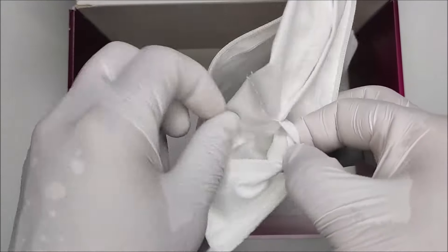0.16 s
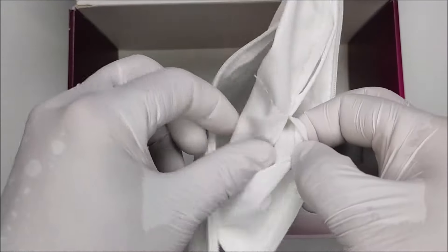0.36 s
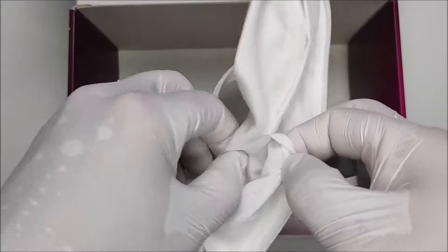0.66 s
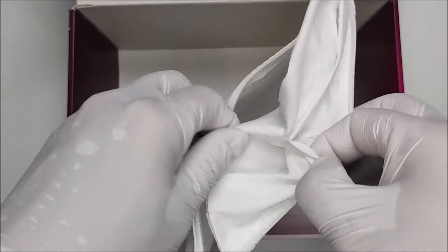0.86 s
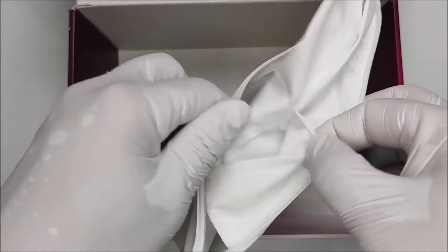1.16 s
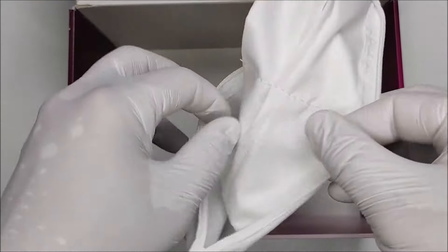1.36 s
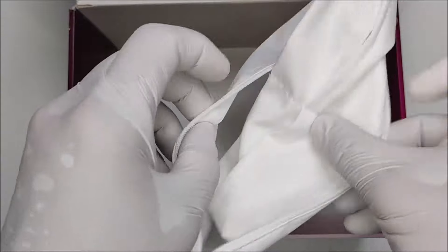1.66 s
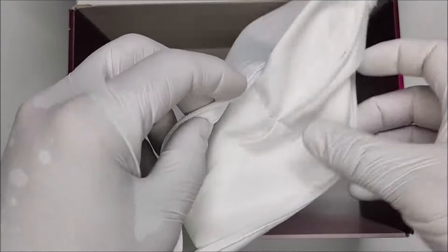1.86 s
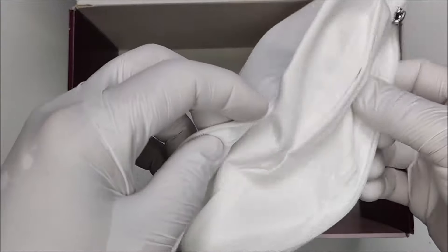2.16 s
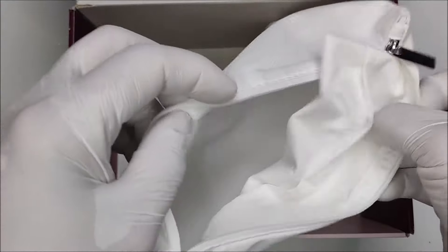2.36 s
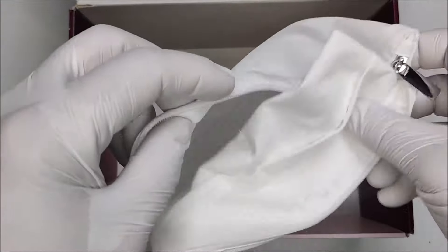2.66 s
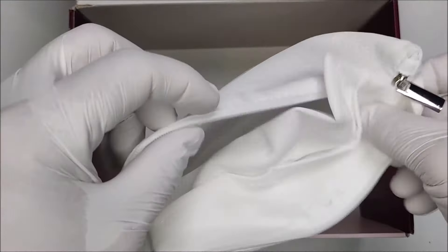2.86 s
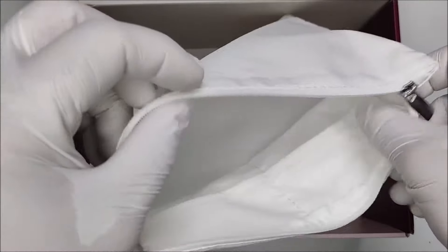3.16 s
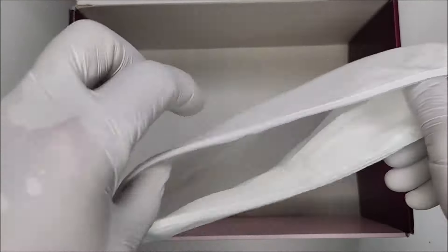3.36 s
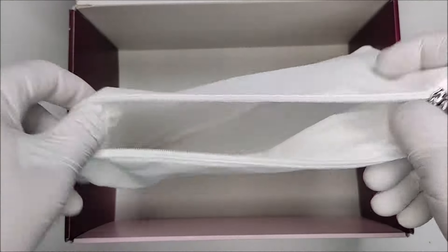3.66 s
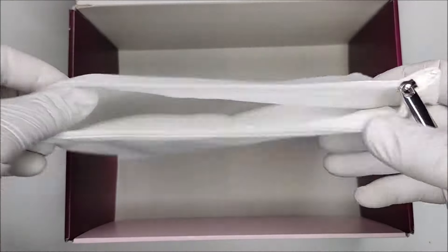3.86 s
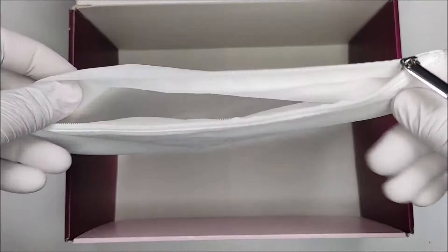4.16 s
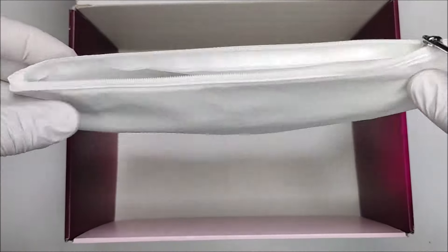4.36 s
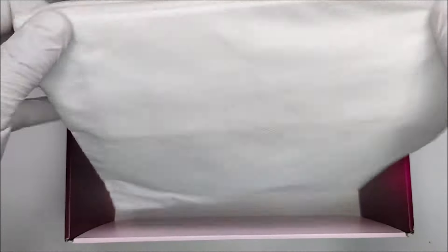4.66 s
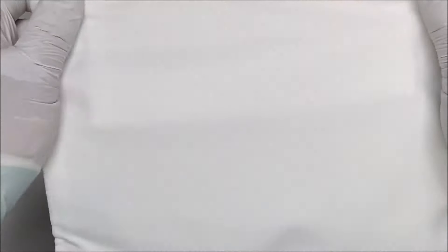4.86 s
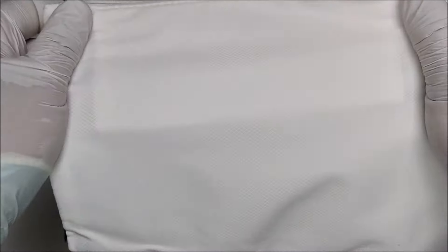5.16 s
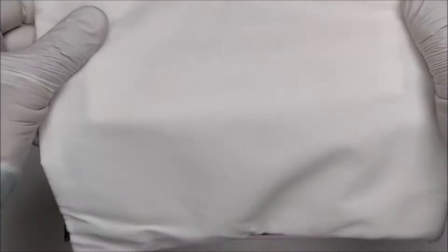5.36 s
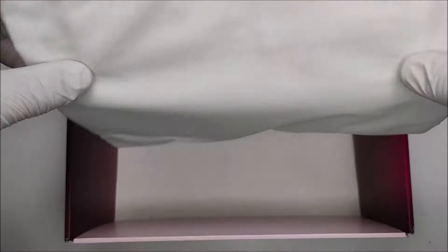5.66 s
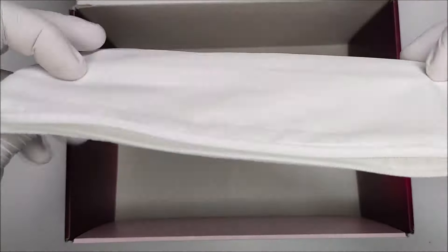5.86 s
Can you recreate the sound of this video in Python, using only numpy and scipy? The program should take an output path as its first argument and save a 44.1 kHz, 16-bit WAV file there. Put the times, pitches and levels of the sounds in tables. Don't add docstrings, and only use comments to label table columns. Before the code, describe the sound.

Close, soft cloth rustling as gloved hands unfold and stretch a zippered pouch, with small metallic zip ticks and faint hollow cardboard knocks.

```python
import sys
import numpy as np
from scipy import signal
from scipy.fft import rfft, irfft
from scipy.io import wavfile
from scipy.ndimage import uniform_filter1d

SR = 44100
rng = np.random.default_rng(int(sys.argv[2]) if len(sys.argv) > 2 else 0)


def dump_mix(stems):
    frames = np.atleast_2d(stems).T
    limited = np.clip(frames, -1, 1)
    pcm = np.round(limited * 32767).astype(np.int16)
    wavfile.write(sys.argv[1], SR, pcm)


def rack_gain(trim_db):
    fader = np.asarray(trim_db, float)
    return 10 ** (fader / 20)


N = 265482


def shape(x, points):
    hz, db = np.transpose(points)
    f = np.arange(N // 2 + 1) * SR / N + 1e-3
    gain = rack_gain(np.interp(np.log(f), np.log(hz), db))
    return irfft(rfft(x) * gain, N)


def band(x, lo_hz, hi_hz):
    edges = [lo_hz, min(hi_hz, 0.49 * SR)]
    return signal.sosfilt(signal.butter(2, edges, "bandpass", fs=SR, output="sos"), x)


def walk(rate_hz):
    hold = int(SR / rate_hz)
    levels = np.repeat(rng.standard_normal(N // hold + 1), hold)
    return 1.06 * uniform_filter1d(levels, hold)[:N]


def ring(modes, t):
    return sum(rack_gain(db) * np.sin(2 * np.pi * hz * t) * np.exp(-np.log(1000) * t / t60)
               for hz, db, t60 in modes)


def add(out, x, start_s, peak_db, pan_db, lag):
    x = x * rack_gain(peak_db) / np.abs(x).max()
    for side, delay, gain in ((0, lag, rack_gain(pan_db / 2)), (1, 0, rack_gain(-pan_db / 2))):
        i = int(start_s * SR + delay)
        out[side, i:i + len(x)] += gain * x[:N - i]


# peak_s, hiss_db,
# rise_ms and fall_ms [per 10 dB], crumple_db [over hiss]
HAND_STROKES = [(0.002, -55.5, 50, 302, -4.5), (.322, -54.5, 130, 111, -13), (.432, -50.5, 35, 57, -14),
                (0.562, -56, 42, 62, -7.5), (.651, -56.5, 72, 274, -10), (0.927, -52, 69, 61, -6.5),
                (1.219, -50.5, 50, 61, -9), (1.305, -51.5, 88, 76, -7.5), (1.454, -55.5, 78, 220, -10),
                (1.639, -49, 57, 290, -20), (1.759, -57.5, 189, 75, -0.5), (1.858, -54, 37, 137, -5),
                (2.003, -63.5, 62, 45, 11), (2.197, -58.5, 40, 298, -8.5), (2.31, -57.5, 115, 50, -6.5),
                (2.386, -45, 49, 139, -5), (2.699, -50.5, 90, 107, -4.5), (2.831, -50, 63, 48.5, -11),
                (2.946, -48.5, -1, 65, -16), (2.985, -43.5, 34, 58, -14.5), (3.04, -47.5, 111, 53, -5),
                (3.238, -55, 49, 330, -7), (3.495, -53.5, 90, 150, -10), (3.649, -53.5, 170, 60.4, -9.5),
              (3.749, -52, 21, 75, -8.5), (3.879, -50.5, 143, 143, -10.5), (4.173, -54.5, 150, 298, -9.5),
              (4.422, -49.5, 205, 135, -15), (4.617, -51.5, 110, 80, -14.5), (4.707, -50.5, 80, 132, -21),
              (4.916, -56, 470, 69, -4.5), (5.006, -58, 66, 62, -5.5), (5.375, -55, 18, 600, -11.5),
              (5.47, -54, 88, 296, -9), (5.62, -51, 120, 279, -16), (5.83, -60, 100, 50.3, -1.5),
              (5.908, -50, 69, 80, -12), (5.984, -49.5, 46, 35, -13)]


def strokes(stall=0.096, rub_db=-7, rub_per_crumple=0.21):
    step = 32
    t = np.arange(0, N, step) / SR
    power = 1e-12
    for peak_s, hiss_db, rise_ms, fall_ms, crumple_db in HAND_STROKES:
        away = 1000 * np.where(t < peak_s, (peak_s - t) / max(rise_ms, 9), (t - peak_s) / fall_ms)
        level_db = hiss_db - 10 * away * (1 + stall * away)
        over_hiss_db = np.array([[0], [rub_db + rub_per_crumple * crumple_db], [crumple_db]])
        power = power + rack_gain(level_db + over_hiss_db) ** 2
    return np.sqrt(np.repeat(power, step, axis=1)[:, :N])


# pitch_hz, level_db
CLOTH_COLOUR = [(60, -2), (130, 3), (400, 0.5), (900, -2), (1450, -6.5), (2000, 0), (2800, -7), (3600, -5),
                (7000, 2), (12000, -4), (14500, -17)]


def fibres(snaps_per_s=3000, spread_db=4.5, grain_db=-7):
    size = rack_gain(spread_db * np.minimum(rng.exponential(size=N), 4))
    snapped = rng.random(N) < snaps_per_s / SR
    snaps = band(snapped * size * rng.standard_normal(N), 2030, 21000)
    x = rng.standard_normal(N) + rack_gain(grain_db) * snaps / snaps.std()
    x = x * rack_gain(1.5 * walk(30) + 2.5 * walk(200))
    return shape(x / x.std(), CLOTH_COLOUR)


# time_s, right_hand_share [0-1], left_minus_right_db
HAND_PLACES = [(0, 0, 1), (.8, 0.4, 0), (1.5, 0.2, 3.5), (1.9, 0.03, 3.5), (2.5, 0.1, 3), (3.2, 0, 2),
               (3.55, 1, 5.5), (3.7, 0.6, 0), (4.2, 0.76, 2), (4.7, 0.94, 0.5), (5.7, 1, 1.5),
               (6.02, 0.9, 4)]


def rustle(lag_left=-3, lag_right=12, scatter_db=2.5, lumpy_db=3.0, patchy_db=1.0):
    t = np.arange(N) / SR
    sliding, rubbing, folding = strokes()
    time_s, share, pan_db = np.transpose(HAND_PLACES)
    right = np.clip(np.interp(t, time_s, share), 0, 1)
    pan_db = np.interp(t, time_s, pan_db)
    left_gain, right_gain = np.sqrt(1 - right), np.sqrt(right)
    left_hand, right_hand = fibres(), fibres()
    at_left = left_gain * np.roll(left_hand, lag_left) + right_gain * np.roll(right_hand, lag_right)
    at_right = left_gain * left_hand + right_gain * right_hand
    scattered = band(np.array([fibres(), fibres()]), 300, 23000)
    cloth = np.array([at_left, at_right]) + rack_gain(scatter_db) * scattered
    hiss = band(cloth, 7620, 16000) * sliding * rack_gain(-3.5 + 0.45 * np.array([pan_db, -pan_db]))
    rub = band(cloth, 760, 5130) * rubbing * rack_gain(7 + patchy_db * walk(90))
    folds = band(cloth, 57.4, 1320) * folding * rack_gain(8.5 + lumpy_db * np.tanh(walk(60)))
    return hiss + rub + folds


# start_s, peak_db, left_minus_right_db, length_ms
SKIDS = [(0.422, -37.5, -8.5, 9.6), (1.205, -47.5, -16, 17), (1.632, -25, 9, 7.2), (1.8701, -48, 8, 11),
         (1.9136, -38, 23, 17.3), (2.3994, -43, -7, 12), (2.6733, -34, -2, 18), (2.9407, -53, 18, 15),
         (2.9776, -34, 17, 29), (3.8636, -32.5, -5, 21), (4.371, -38.5, -9, 6.7), (5.4594, -45, -19, 30)]


def slips(port_db=-9):
    out, grain = np.zeros((2, N)), band(fibres(grain_db=-2.5), 8900, 24000)
    for start_s, peak_db, pan_db, ms in SKIDS:
        u = np.arange(3000) / SR / (ms / 1000)
        i = int(start_s * SR)
        skid = grain[i:i + 3000] * u * np.exp(-u * u)
        add(out, skid, start_s - 0.003, peak_db + port_db, pan_db, lag=3)
    return out


# start_s, peak_db, left_minus_right_db, rattle_ms
TAB_TICKS = [(.493, -49, -6, 2.4), (1.5206, -48, -10, 2), (1.847, -24.5, 11, 0.99), (1.859, -43, 12, 2),
             (1.865, -39, 12, 1.5), (2.2728, -34, 9, 2), (2.283, -37, 7, 3), (2.342, -46, 5, 1.5),
             (2.401, -35, 6, 1.5), (2.37, -30, 13, 2.3), (2.3774, -27.5, 8, 2.2), (2.390, -28.5, 4, 1.3),
             (2.466, -35, 12, .9), (2.471, -34.5, 13, 1.6), (2.4814, -42, 5, 1.2), (3.031, -25, 6, 2.5),
             (3.570, -36.5, 17, 1.4), (3.91, -33.5, 5, 1.8), (3.9267, -40, 11, 1.6),
             (3.9584, -41.5, -8, 1.5), (4.501, -41.5, 6, 1.8), (4.515, -40, 2, .6), (4.603, -22.5, 7, 1.3),
             (4.994, -45, -2, 1.5), (5.876, -45, 4.5, 0.87), (5.867, -42, 7, 1.2), (5.886, -42, 10, .8),
             (5.889, -36, 18, 1.2), (5.897, -40, 16, 1.5), (5.921, -37, 10, 1.5), (5.976, -36, 6, .8),
             (5.91, -26.5, -3, 1.8), (5.927, -26, 10, 0.99), (5.939, -44, 0, 1.1), (5.9783, -25.5, 6, 1.5)]
# start_s, peak_db, pitch_hz, left_minus_right_db, ring_db
TAB_STRIKES = [(1.841, -32.5, 10730, 22, -7), (1.8696, -37, 9740, 19, -18), (1.9874, -34, 9600, 8, 12),
               (2.194, -44, 10400, 25, 5), (2.687, -30.5, 10260, 5, -11), (3.0354, -34, 10500, 2.5, -11),
               (3.0418, -23, 9370, -2, 10), (3.0466, -12, 10750, 16, 6), (3.0443, -26, 9400, -3, 4),
               (3.049, -20, 10800, 14, -2), (3.0525, -15.5, 10900, 1, 2), (3.086, -32, 12100, 6.5, -12),
               (3.0887, -21.5, 10540, 5, -3), (3.294, -38, 10140, 8, 0), (3.581, -29, 10660, 18, 0.5),
               (3.7344, -29.5, 8800, 0, -14), (3.9674, -44, 8500, -3, -5), (4.2297, -34.5, 9470, 8, -1),
               (5.864, -40, 10100, 9, 2), (5.974, -33, 9600, 5, -3)]
# pitch_hz, level_db, t60_s
TAB_MODES = [(5620, -14, 0.0089), (9400, -1.5, 0.014), (13050, 1, 0.011)]


def zip_tab(port_db=-7, own_s=0.0022, rise_s=0.00055):
    out, t = np.zeros((2, N)), np.arange(1500) / SR
    rows = [(s, db, 10220, pan_db, ms, -8) for s, db, pan_db, ms in TAB_TICKS]
    rows += [(s, db, hz, pan_db, 1.4, ring_db) for s, db, hz, pan_db, ring_db in TAB_STRIKES]
    rise = 1 - np.exp(-(t / rise_s) ** 2)
    first_blow = 1.6 * (np.arange(1500) == 6)
    for start_s, peak_db, hz, pan_db, rattle_ms, ring_db in rows:
        swell = rise * np.exp(-(t / (rattle_ms * 0.002)) ** 2)
        contact = rng.standard_normal((2, 1500)) * swell + first_blow
        rattle = band(band(contact, 8800, 14740), 5100, 22800)
        rattle = rattle / np.abs(rattle).max()
        tone = ring(TAB_MODES, t) + np.sin(2 * np.pi * hz * t) * np.exp(-(t / own_s) ** 2)
        struck = rattle[0] + rack_gain(ring_db) * tone * rise
        add(out, struck, start_s, peak_db + port_db, pan_db * 1.06, lag=0.92)
        add(out, rattle[1], start_s, peak_db + port_db - 49, -40, lag=0)
    return out


# start_s, peak_db, pitch_hz, length_ms
TAB_SONGS = [
    (1.871, -42.5, 9600, 5.4),
    (1.989, -48, 9630, 10),
    (3.033, -35, 10780, 5.2),
    (3.043, -35.5, 9070, 14),
    (3.090, -36, 9450, 3),
    (4.229, -51.5, 9506, 9.7),
    (4.604, -49.5, 9380, 21),
    (5.978, -41, 9540, 9.7),
]


def free_rings(fade=0.61, upper_hz=12850, upper_db=-14, wobble_db=3.0):
    out, t = np.zeros((2, N)), np.arange(1500) / SR
    wobble = rack_gain(wobble_db * walk(500))
    rise = 1 - np.exp(-t / 0.00052)
    for start_s, peak_db, hz, ms in TAB_SONGS:
        tone = np.sin(2 * np.pi * hz * t) + rack_gain(upper_db) * np.sin(2 * np.pi * upper_hz * t)
        tone = tone * np.roll(wobble, -int(start_s * SR))[:1500]
        u = t / (ms / 1000)
        add(out, tone * rise * np.exp(-fade * u - u ** 8), start_s, peak_db, 0, lag=0.8)
    return out


# start_s, peak_db, pitch_hz [of the spot hit], click_db
BOX_KNOCKS = [(0.114, -46.5, 283, -4), (0.293, -48, 187, -6), (0.342, -40.5, 382, -1.5),
              (0.781, -40.5, 375, -5), (0.901, -43.5, 404, -6.5), (0.914, -47, 500, -7),
              (1.255, -42.5, 347, -9), (1.38, -51.5, 187, -19), (1.54, -48, 829, -8),
              (1.635, -47.5, 244, -9), (1.914, -41, 334, 6), (1.939, -47, 230, -18),
              (1.961, -26, 189, -7.5), (2.173, -45, 470, -8.5), (2.33, -44, 458, -20),
              (2.423, -38, 320, -18.5), (2.444, -43.5, 296, -18), (2.641, -44.5, 800, 0),
              (2.794, -45.5, 253, 2), (2.966, -47.5, 400, -16), (3.027, -45, 600, 1),
              (3.029, -37.5, 365, -8), (3.046, -41.5, 275, -8), (3.082, -38, 900, -2),
              (3.0885, -36, 174, -15), (3.211, -42.5, 172, -10), (3.49, -41, 320, 1),
              (3.501, -46, 200, -23), (3.937, -40, 860, -30), (4.136, -47, 436, 1), (4.6, -46, 930, -1),
              (4.818, -49, 151, -13), (4.833, -47.5, 264, -20), (5.832, -45.5, 154, -7)]
# pitch_hz, level_db, t60_s
BOX_MODES = [(172, -6, 0.093), (334, -9.5, 0.035), (490, -4.5, 0.023), (686, -13, .02), (890, -4.5, 0.046),
             (1150, -1.5, 0.018), (1870, -2.5, 0.086), (2010, -10, .09), (2600, -20, .03), (3350, -14, .02),
             (3860, -13, .015)]


def knocks(local_db=3, local_t60=0.015, late_s=0.00306, box_damp=0.63):
    out, t = np.zeros((2, N)), np.arange(5000) / SR
    for start_s, peak_db, hz, click_db in BOX_KNOCKS:
        octaves = np.log2(hz / 300)
        contact_ms = 0.18 * 2 ** (-0.97 * octaves) * rack_gain(-0.5 * click_db)
        pan_db = -2.5 + 1.5 * octaves
        light = float(peak_db < -31)
        shifts = light * rng.standard_normal(len(BOX_MODES))
        body = [(f * (1 + 0.14 * c), db + 3.3 * c, t60 * box_damp ** light)
                for (f, db, t60), c in zip(BOX_MODES, shifts)]
        u = t[:400] / (contact_ms / 1000)
        push = u * np.exp(-2 * u)
        ringing = ring(body + [(hz, local_db, local_t60)], t)
        thud = band(np.convolve(ringing, push)[:5000], 250, 22000)
        scrape = rng.standard_normal(5000) * (np.exp(-t / 0.00092) + 0.21 * np.exp(-t / 0.0056))
        click = band(scrape, 1100, 5000)
        knock = rack_gain(click_db) * click / np.abs(click).max() - thud / np.abs(thud).max()
        add(out, knock, start_s + late_s, peak_db, pan_db, lag=3.7)
    return out


# start_s, peak_db, pitch_hz,
# left_minus_right_db
DRY_POPS = [(0.3056, -51, 5400, -11), (0.7834, -44.5, 1430, -8), (0.785, -51, 3700, -7),
            (.916, -57, 2300, -3), (1.847, -49, 3200, -7), (1.9635, -41, 2050, 7), (2.2744, -54, 3420, 7),
            (2.367, -43, 5560, -1), (2.688, -43, 6000, 0), (3.0525, -57, 5500, 2), (3.089, -47, 1900, 0),
            (2.395, -49, 1900, 0), (2.448, -52, 2000, 0), (2.97, -52, 2200, 4), (1.849, -46, 4500, 5),
            (3.198, -50, 910, 1), (3.579, -56, 2080, 6), (3.735, -47.5, 5700, -12),
            (4.008, -49, 2100, -1), (4.137, -46.5, 1870, -3), (4.432, -55, 2500, 0),
            (4.443, -58, 2300, 3), (4.456, -47, 3300, -10), (4.466, -54, 2400, 0), (4.488, -58, 2600, 0),
            (4.476, -51, 2260, 5), (4.502, -42.5, 3100, 15), (4.6014, -47, 5640, 0.5),
            (5.91, -51, 5340, -2), (5.928, -40, 5840, 3)]


def pops(decay_s=0.00085, width=0.29):
    out, t = np.zeros((2, N)), np.arange(600) / SR
    for start_s, peak_db, hz, pan_db in DRY_POPS:
        burst = rng.standard_normal(600) * np.exp(-t / decay_s)
        pop = band(burst, hz / (1 + width), hz * (1 + width))
        add(out, pop, start_s, peak_db - 0.5, pan_db, lag=0.54)
    return out


def room(near, t60=0.26, wet_db=-24):
    t = np.arange(int(0.3 * SR)) / SR
    decay = np.exp(-np.log(1000) * t / t60) * (t > 0.0008)
    tail = band(rng.standard_normal((2, len(t))), 160, 12000) * decay
    tail = tail / np.sqrt((tail ** 2).sum(axis=1, keepdims=True))
    return rack_gain(wet_db) * signal.fftconvolve(near, tail, axes=1)[:, :N]


# pitch_hz, level_db [per Hz]
AIR_COLOUR = [(1, -66.5), (3, -62.5), (8, -63.5), (20, -73.5), (40, -79.5), (80, -82.5), (200, -99),
              (500, -109), (1500, -115), (15000, -115)]
# pitch_hz, level_db [per Hz]
ROOM_COLOUR = [(40, -110), (100, -97), (250, -99), (500, -103), (1000, -109), (3000, -114), (8000, -119),
               (14500, -119)]


def quiet(apart=1.0):
    noise = rng.standard_normal((5, N)) * np.sqrt(SR / 2)
    tone = noise[0] + apart * band(noise[1:3], 203, 18000)
    return shape(noise[3:], AIR_COLOUR), shape(tone, ROOM_COLOUR) * rack_gain(walk(3.47))


# pitch_hz, width_hz, level_db
PORT_RINGS = [(10845, 800, 13), (8700, 1020, 16.5)]


def ports(x):
    heard = []
    for side, (hz, width_hz, db) in zip(x, PORT_RINGS):
        resonance = signal.lfilter(*signal.iirpeak(hz, hz / width_hz, SR), side)
        heard.append(side + (rack_gain(db) - 1) * resonance)
    return np.array(heard)


def scene():
    hits = zip_tab() + free_rings() + pops() + knocks()
    air, tone = quiet()
    return ports(rustle() + slips() + hits + room(hits) + tone) + air


def roll_off(x):
    return signal.sosfilt(signal.butter(12, 15100, fs=SR, output="sos"), x)


def record(dry):
    top_cut = signal.cheby1(7, 0.3, 14450, fs=SR, output="sos")
    mix = signal.sosfilt(top_cut, dry)
    return roll_off(mix)


dry = scene()
out = record(dry)
dump_mix(out)
```